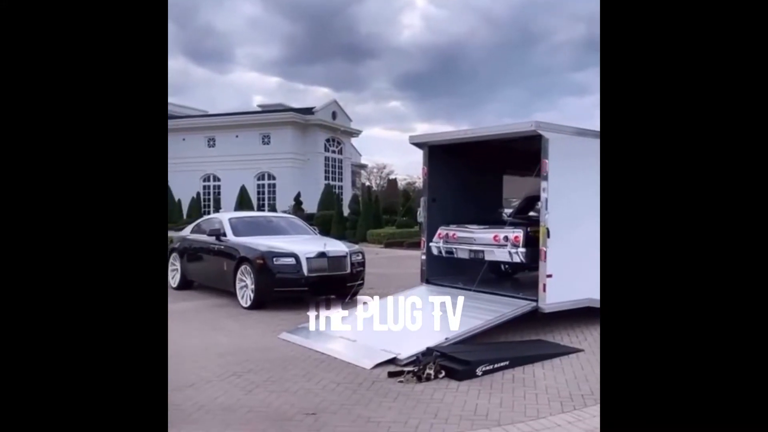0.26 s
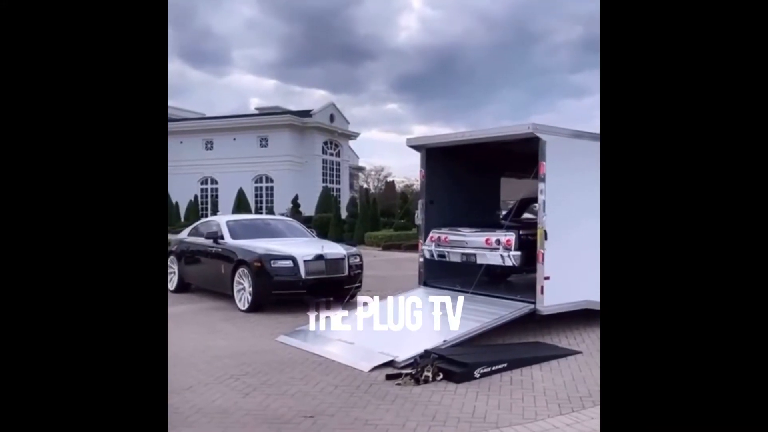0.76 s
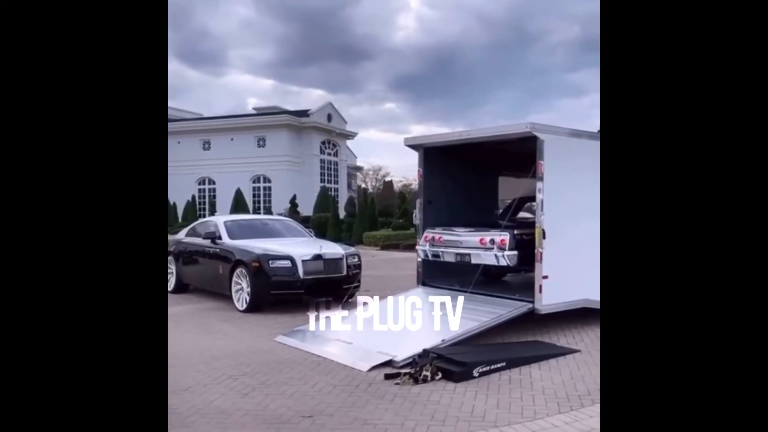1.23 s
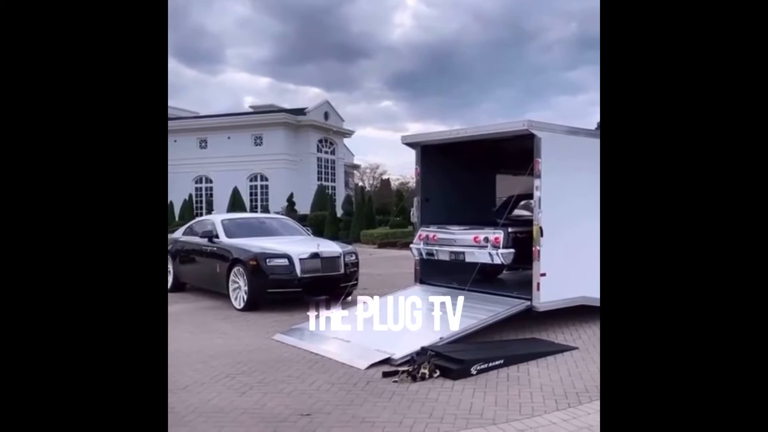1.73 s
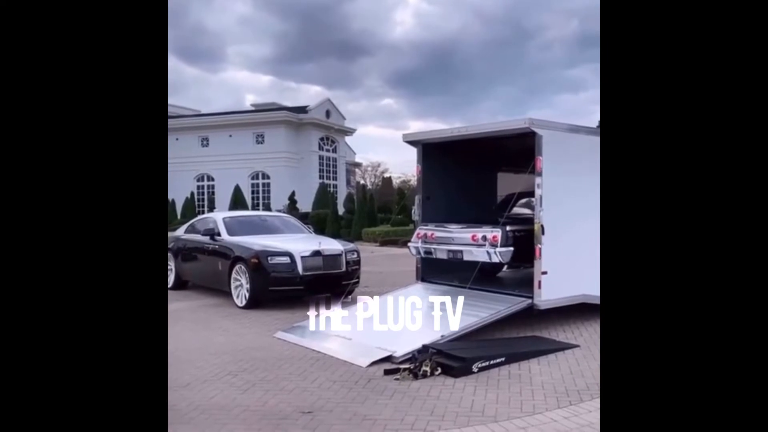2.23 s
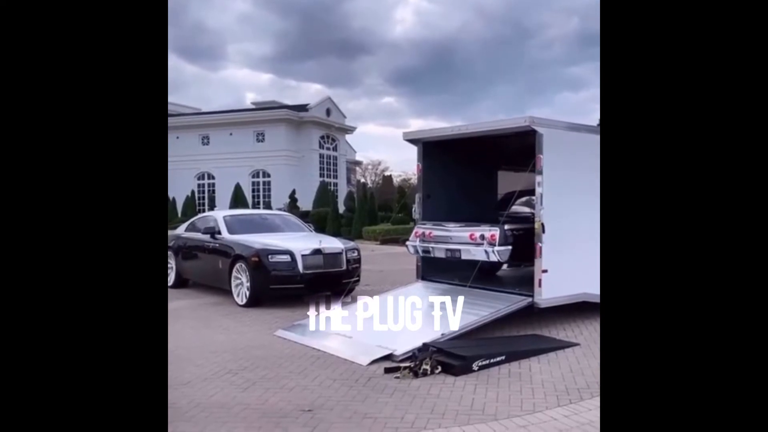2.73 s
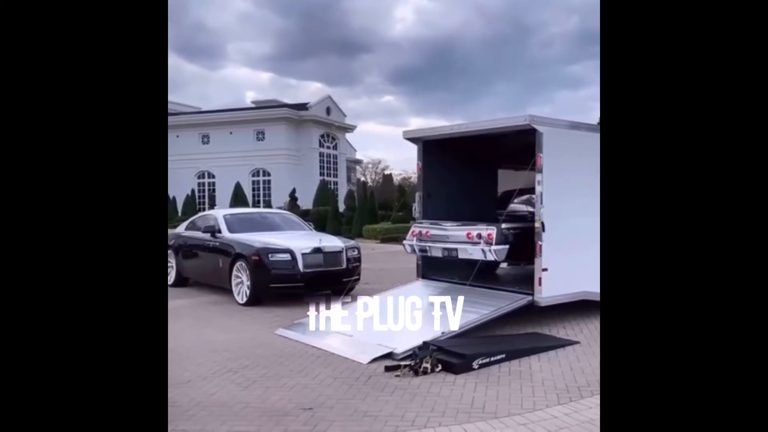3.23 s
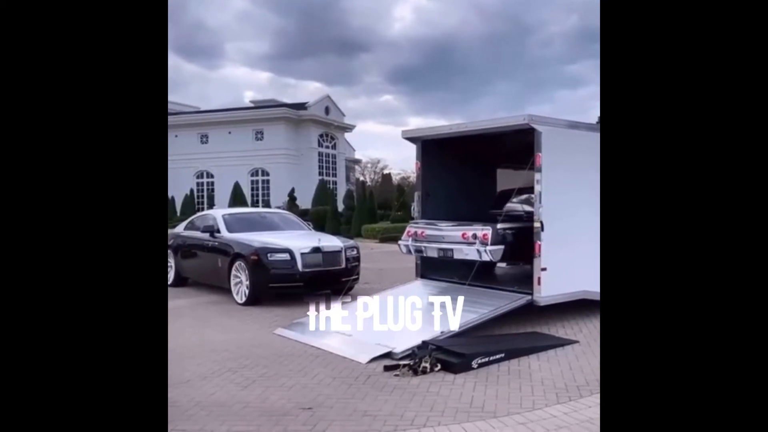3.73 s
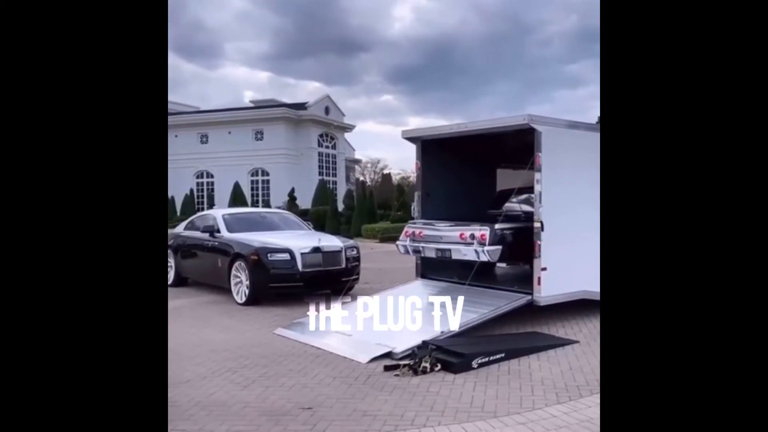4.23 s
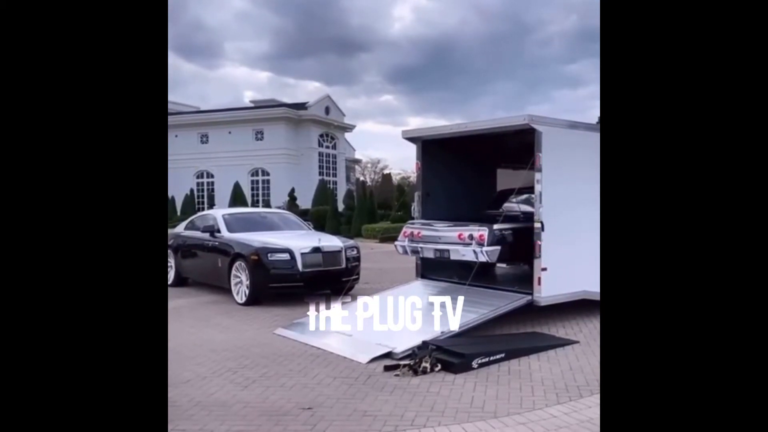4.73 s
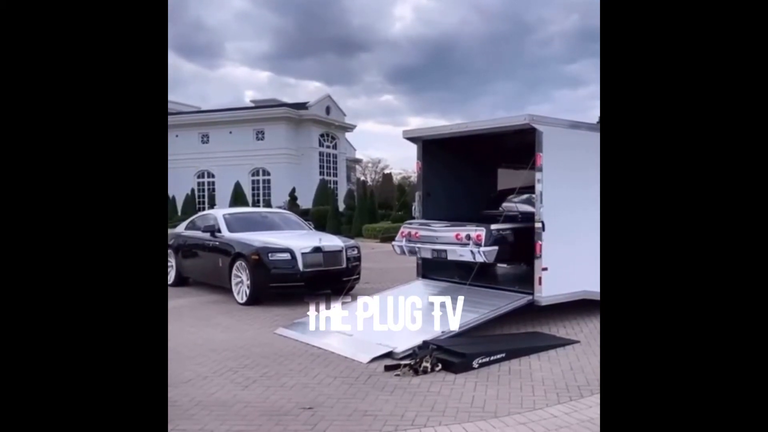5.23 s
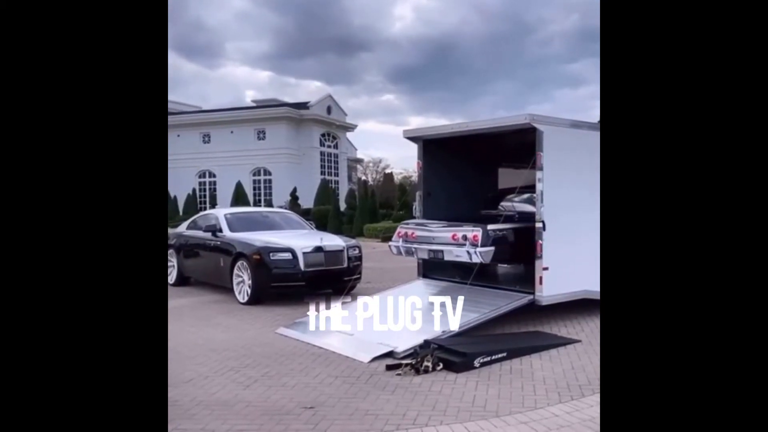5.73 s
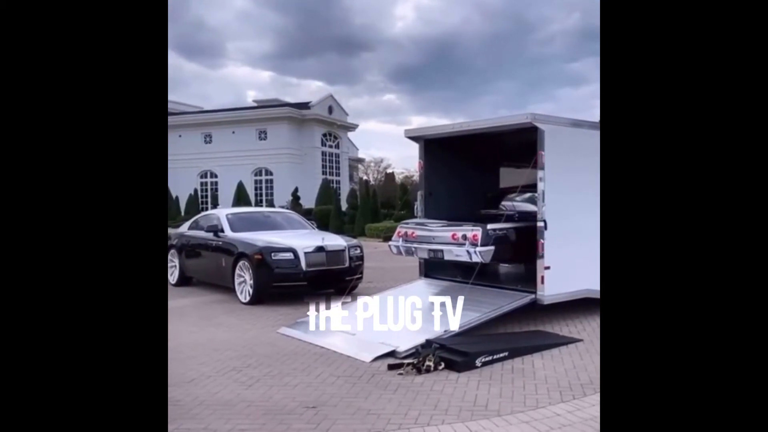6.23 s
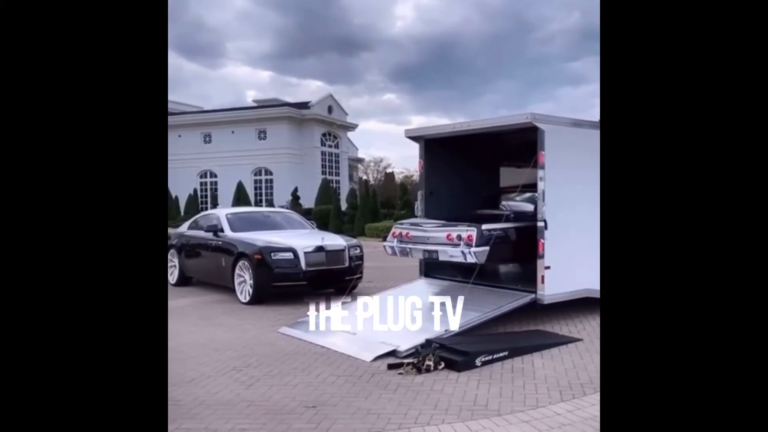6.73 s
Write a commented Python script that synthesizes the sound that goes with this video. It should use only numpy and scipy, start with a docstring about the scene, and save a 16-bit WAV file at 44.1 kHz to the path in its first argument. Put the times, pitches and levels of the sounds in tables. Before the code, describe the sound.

An old V8 engine idles outdoors from start to finish, with a deep, uneven, burbling rumble that slows very slightly. The open box trailer adds a throbbing drone. Behind it are a soft fan hiss with light ticking, a faint wavering belt whine and the very faint hum of a parked car. As the car eases backward, the metal ramp gives light clanks just before 1 second, again around 2.7 seconds, and a small tick at 3.5. The tyres scrub softly around 4.7 seconds, with a clank and a tiny squeak, followed by a creak at about 5.4. Between 6.1 and 6.6 seconds there is a quick cluster of knocks, short high hinge squeaks and more scrubbing. The sharpest clank comes at about 6.9 seconds, over the continuing idle.

```python
"""Outdoors, at the metal ramp of a box trailer, an old V8 idles while the car slowly backs out.
Its uneven firings are a pulse train that drives resonances of exhaust and trailer; behind the boom
are the engine's hiss, valve ticks and whine, and the hum of a parked car. Under the shifting weight
the tyres scrub by friction, the ramp clanks in its own modes and the hinge squeaks by stick-slip."""
import sys
import numpy as np
from scipy import signal
from scipy.fft import rfft, irfft, next_fast_len
from scipy.io import wavfile

SR = 44100
rng = np.random.default_rng(int(sys.argv[2]) if len(sys.argv) > 2 else 0)


def dump(signal):
    """Clip the signal to [-1, 1] and save it as 16-bit WAV at the path in sys.argv[1]."""
    limited = np.clip(np.atleast_2d(signal).T, -1, 1)
    pcm = np.round(limited * 32767).astype(np.int16)
    wavfile.write(sys.argv[1], SR, pcm)


N = 308259
TIME = np.arange(N) / SR
SIZE = next_fast_len(N + SR)  # a ring of samples, with room for what sounds before time zero
HZ = np.fft.rfftfreq(SIZE, 1 / SR) + 1e-3

# engine speed in four-stroke cycles: time_s, cycle_rate_hz
ENGINE_SPEED = [(0.0, 6.451), (0.66, 6.636), (1.29, 6.401), (2.32, 6.497), (2.68, 6.366), (3.9, 6.263),
                (4.28, 6.18), (4.88, 6.192), (5.4, 6.289), (6.01, 6.257), (6.3, 6.08), (6.6, 6.115),
                (7.0, 6.105)]
# cylinders in firing order: relative_strength, delay_in_firing_intervals
FIRING_PATTERN = [(.92, -.042), (.82, .031), (.56, -.131), (.41, .041), (.99, .061), (.62, -.098),
                  (.66, .005), (.5, .129)]
# low resonances of exhaust and trailer: centre_hz, width_hz, polarity
EXHAUST_MODES = [(53.8, 28.4, 1), (87.5, 12.8, -1), (107.2, 39, -1), (139.5, 8, 1)]
# the lower two, as the tailpipes move out and the load changes: time_s, first_db, second_db
LOWER_MODE_LEVELS = [(0.05, -24, -25.5), (0.3, -25, -27), (0.55, -24.9, -26.5), (0.8, -25.3, -30),
                     (1.12, -25.5, -23.5), (1.38, -24, -27.5), (2.1, -25, -25.5), (2.4, -25, -24),
                     (2.72, -25, -26), (3.0, -23.5, -24), (3.75, -24, -23.5), (4.15, -24.5, -26.3),
                     (4.5, -23, -28.5), (4.72, -24.2, -24.5), (4.95, -25, -27), (5.25, -24.5, -26),
                     (5.5, -25, -24.5), (6.05, -25.5, -24.5), (6.28, -26, -29), (6.45, -23.5, -24.5),
                     (6.65, -24.1, -26.5), (6.95, -25, -23.8)]
# the upper two, which each swell once: base_db, slope_db_per_s, peak_s, width_s, lift_db
UPPER_MODE_SWELLS = [(-48, 1.03, 3.6, 0.69, 6.5), (-48, -1.55, 0.65, 0.93, 8.5)]
# spectrum of the exhaust burble: frequency_hz, relative_db
BURBLE_SPECTRUM = [(90, -26), (122, 6), (155, 2), (183, -4), (210, -0.5), (237, -12), (258, -4.5),
                   (292, -8.5), (325, -10.5), (360, -13.5), (410, -23.5), (500, -28.5), (900, -50.5)]
# standing waves in the trailer box: centre_hz, width_hz
BOX_MODES = [(149, 20), (212, 12), (252, 26), (293, 14), (352, 30)]
# their levels as the tailpipes pass through: time_s, then level_db of each wave from low to high
BOX_LEVELS = [(0.1, -53, -50, -62, -46, -60), (1.1, -53.5, -50.5, -61, -49, -58.5),
              (2.3, -49, -51, -53, -54.5, -54), (3.7, -47, -58.5, -50, -60, -58.5),
              (4.7, -41.5, -52, -47.5, -53.5, -53.5), (5.8, -49.5, -54, -48.5, -52, -60.5),
              (6.9, -44, -49.5, -51.5, -50.5, -63.5)]
# spectrum of fan and belt hiss: frequency_hz, relative_db
HISS_SPECTRUM = [(150, -9.5), (330, -0.5), (480, -3.5), (535, -1), (585, 2.5), (760, 3), (950, 0.5),
                 (1700, -0.5), (2750, -4.5), (4100, -7.5), (4500, -11), (5500, -12.5), (5900, -14.5),
                 (8700, -13.5)]
# resonances of the engine bay: centre_hz, width_hz, lift_db
BAY_MODES = [(1145, 30, 3.5), (1370, 150, 1), (2240, 30, 4), (2295, 36, 5.5), (2500, 110, 2),
             (3290, 160, 2.5), (4030, 130, 3)]
# the belt-driven whine and a fainter line just above it: vibrations_per_engine_cycle
BELT_ORDERS = [231, 239]
# the main whine: time_s, level_db
MAIN_WHINE_LEVELS = [(0, -47.5), (.25, -45.5), (.42, -58), (.73, -51), (1.2, -51), (1.3, -56), (1.4, -49.5),
                     (1.62, -51.5), (1.77, -53), (2.0, -54.5), (2.3, -55), (2.55, -55), (2.72, -52),
                     (3.0, -50.5), (3.15, -56), (3.35, -54), (3.47, -48), (3.7, -54.5), (3.95, -58),
                     (4.15, -57), (4.35, -46.5), (4.65, -51.5), (4.95, -62), (5.7, -56), (6.02, -50.5),
                     (6.2, -55.5), (6.55, -49), (6.85, -64)]
# the whine just above it: time_s, level_db
UPPER_WHINE_LEVELS = [(3.1, -66), (3.5, -58), (3.8, -55), (4.05, -48), (4.3, -60), (4.8, -53), (5.8, -61)]
# tones of the parked car: pitch_hz, initial_db, width_hz, slope_db_per_s
HUM_TONES = [(221, -59, 3, -.6), (294, -56, 3, -.6), (359, -62, 4, -1), (369, -53.5, 3, -1.25),
             (432, -74, 3, 2.4), (442, -67, 4, 0), (504, -67, 2, 0), (629, -61.5, 2, .3), (648, -63, 2, 0),
             (685, -58, 2, 0), (1369, -60.5, 2, 0), (1887, -60, 13, .3)]
# spectrum of the open air: frequency_hz, relative_db
AIR_SPECTRUM = [(8, -13.0), (22, -9.0), (38, -4.0), (70, 1.0), (150, -12.5), (600, -47.0)]
# tyres scrubbing on the deck: peak_s, length_s, level_db
TYRE_SCRUBS = [(0.017, 0.38, -45.5), (4.685, 0.76, -40.5), (6.227, 0.12, -42.5), (6.402, .09, -45),
               (6.55, .3, -47)]
# spectrum of dragging rubber: frequency_hz, relative_db
SCRUB_SPECTRUM = [(250, -14), (650, -3), (1100, -1.5), (2500, -3), (4000, -1.5), (5200, -10), (6500, -16.5),
                  (8700, -17.5)]
# clanks and creaks of ramp and trailer: start_s, level_db, bright_hz, spread_octaves, rise_s, t60_s
RAMP_CLANKS = [(.813, -36.5, 2400, .4, .0015, .15), (.965, -34, 2500, 0.67, .0004, .15),
               (.967, -34, 750, .6, .002, .11), (.976, -40, 4300, .4, .006, .18),
               (2.673, -34.5, 2000, 1.8, .005, .16), (2.746, -35.5, 4600, 2.2, .001, 0.15),
               (3.489, -37.5, 3000, 1.5, .001, 0.055), (4.765, -39, 5200, .6, .006, .15),
               (4.813, -35.5, 1900, .7, .0005, .1), (5.356, -38, 2150, 0.33, .008, 0.28),
               (6.147, -36, 1980, .15, .002, 0.11), (6.233, -32, 730, .3, .0023, .04),
               (6.246, -31.5, 2200, .45, .0008, 0.069), (6.258, -39, 1300, .6, .002, .12),
               (6.388, -32.5, 1860, .12, .0008, .075), (6.912, -26.5, 1750, 0.37, .0004, 0.045),
               (6.914, -34, 900, 0.65, .001, .09), (6.917, -35.5, 3000, .12, .002, .07),
               (6.927, -34, 500, .5, .0008, .035)]
# resonances of the metal deck: centre_hz, width_hz, lift_db
RAMP_MODES = [(694, 470, 9), (1600, 110, 9), (1870, 130, 7), (2200, 180, 5), (2560, 200, 5)]
# squeaks of the ramp hinge: start_s, length_s, pitch_hz, level_db
HINGE_SQUEAKS = [(4.812, .012, 2620, -40.5), (6.145, 0.012, 2620, -37), (6.201, 0.025, 2520, -41),
                 (6.38, 0.021, 2580, -40.5)]


def amp(db):
    """Amplitude ratio of a level in decibels."""
    return 10 ** (np.asarray(db) / 20)


def unit_rms(x):
    """Normalisation to rms 1."""
    return x / np.sqrt(np.mean(x ** 2) + 1e-20)


def curves(rows):
    """Linear interpolation of each column of (time_s, ...) rows to every sample."""
    time_s, *columns = np.transpose(rows)
    return [np.interp(TIME, time_s, column) for column in columns]


def spectrum(points):
    """Gain from (frequency_hz, relative_db) points joined on a log-frequency axis."""
    hz, db = np.transpose(points)
    return amp(np.interp(np.log(HZ), np.log(hz), db))


def lifts(humps, along):
    """Gain of Lorentzian (centre, width, lift_db) humps along frequency or time."""
    return amp(sum(db / (1 + (2 * (along - centre) / width) ** 2) for centre, width, db in humps))


def resonance(hz, width_hz):
    """Response of two like damped resonators in cascade."""
    return (1 + 1j * (HZ ** 2 - hz ** 2) / (HZ * width_hz)) ** -2


def filtered(x, response):
    """Filtering by multiplication of spectra, at rms 1."""
    return unit_rms(irfft(rfft(x, SIZE) * response, SIZE)[:N])


def noise(response):
    """Spectrally shaped Gaussian noise, at rms 1."""
    return filtered(rng.standard_normal(SIZE), response)


def drift(hz):
    """Random fluctuation, low-passed near hz, at rms 1."""
    return noise(np.exp(-(HZ / hz) ** 2))


def firings(cycles, unevenness, jitter_s, first_cycle=.114):
    """A quasi-periodic pulse train: one impulse a firing, and no two burn quite alike."""
    strength, delay = np.transpose(FIRING_PATTERN)
    count = len(FIRING_PATTERN)
    firing = np.arange(-2 * count, count * (int(cycles[-1]) + 2))
    at_cycle = first_cycle + (firing + delay[firing % count]) / count
    mean_rate_hz = cycles[-1] / TIME[-1]
    beyond_ends_s = (at_cycle - np.clip(at_cycle, 0, cycles[-1])) / mean_rate_hz
    start_s = np.interp(at_cycle, cycles, TIME) + beyond_ends_s
    burn, slip = rng.standard_normal((len(firing), 2)).T
    starts = np.round((start_s + jitter_s * slip) * SR).astype(int)
    train = np.zeros(SIZE)
    train[starts] = strength[firing % count] * (1 + unevenness * burn)
    return train


def exhaust(cycles, lope=0.037, lowest_hz=33):
    """Forced resonance: low modes of pipes and trailer boom as firing harmonics come into tune."""
    train = firings(cycles, unevenness=0.075, jitter_s=.00008)
    radiated = 1 / np.hypot(1, (lowest_hz / HZ) ** 6)  # the lowest frequencies fall away steeply
    gains = [amp(db) for db in curves(LOWER_MODE_LEVELS)]
    gains += [amp(db + slope * TIME) * lifts([swell], TIME) for db, slope, *swell in UPPER_MODE_SWELLS]
    boom = sum(polarity * gain * filtered(train, resonance(hz, width_hz) * radiated)
               for (hz, width_hz, polarity), gain in zip(EXHAUST_MODES, gains))
    return boom * (1 + lope * drift(18))  # whole cycles run a little richer or leaner


def burble(cycles, level_db=-42.0, gas_db=-1, ring_s=.04, lowest_hz=185):
    """Scattering: trailer walls shift the phases of the firing overtones; each puff adds a gas gust."""
    train = firings(cycles, unevenness=0.13, jitter_s=0.00019)
    t = TIME[:SR // 4]
    walls = rfft(rng.standard_normal(len(t)) * np.exp(-t / ring_s), SIZE)
    scatter = walls / abs(walls) / np.hypot(1, (lowest_hz / HZ) ** 10)  # long waves are not scattered
    gust = filtered(train, 1 / (1 + 1j * HZ / 25))
    gas = filtered((1.0 + gust) * rng.standard_normal(N), spectrum(BURBLE_SPECTRUM))
    overtones = filtered(train, spectrum(BURBLE_SPECTRUM) * scatter)
    return amp(level_db) * unit_rms(0.4 * overtones + amp(gas_db) * gas)


def trailer_box(cycles, throb_db=2.5):
    """Standing waves: the uneven firings sustain a throbbing drone between the walls of the box."""
    train = firings(cycles, unevenness=0.048, jitter_s=.00008)
    drone = sum(amp(db) * filtered(train, resonance(hz, width_hz))
                for (hz, width_hz), db in zip(BOX_MODES, curves(BOX_LEVELS)))
    return drone * unit_rms(amp(throb_db * drift(12)))


def engine_hiss(cycles, level_db=-40.5, tick_depth=0.15, flutter_db=0.95):
    """Amplitude modulation: fan and belt noise pulses with the valves, coloured by the engine bay."""
    valves = np.exp(-(6 * cycles % 1) / .3)  # six ticks a cycle
    rush = rng.standard_normal(N) * (1 + tick_depth * valves) * amp(flutter_db * drift(21))
    return amp(level_db) * filtered(rush, spectrum(HISS_SPECTRUM) * lifts(BAY_MODES, HZ))


def alternator(cycles, waver_hz=10, flicker_db=2.4):
    """Rotational orders: a belt-driven whine and a fainter line eight orders above it waver about fixed
    multiples of the engine speed."""
    out = np.zeros(N)
    for order, levels in zip(BELT_ORDERS, (MAIN_WHINE_LEVELS, UPPER_WHINE_LEVELS)):
        turns = order * cycles + np.cumsum(waver_hz * drift(70)) / SR
        whine = np.sin(2 * np.pi * turns) * amp(flicker_db * drift(41))
        out += amp(curves(levels)[0]) * unit_rms(whine)
    return out


def tone(hz):
    """A sinusoid of rms 1 whose phase is the integral of its frequency."""
    return np.sqrt(2) * np.sin(2 * np.pi * np.cumsum(hz) / SR)


def parked_car():
    """A line spectrum: the hum is a sum of tones, each broadened by slight frequency modulation."""
    return sum(amp(db + slope * TIME) * tone(hz + width_hz / 2 * drift(5.92))
               for hz, db, width_hz, slope in HUM_TONES)


def open_air(level_db=-53):
    """Ambient noise: a faint rumble with its energy at low frequencies."""
    return amp(level_db) * noise(spectrum(AIR_SPECTRUM))


def tyres(grain_db=1.0, edge_db=-7.5):
    """Sliding friction: rubber drags grainily on the deck, edge_db down at the ends of each scrub."""
    drag = sum(amp(db + edge_db * np.log2(1 + (2 * (TIME - peak_s) / length_s) ** 2))
               for peak_s, length_s, db in TYRE_SCRUBS)
    grains = rng.standard_normal(N) * amp(grain_db * drift(150))
    return drag * filtered(grains, spectrum(SCRUB_SPECTRUM))


def ramp(thud_db=-10, air_hz=5000, echo_db=-17, echo_t60_s=0.13):
    """Damped free vibration: each shift of weight rattles the metal deck, and the box echoes it."""
    out, t = np.zeros(N + SR), TIME[:SR // 2]
    hz = np.fft.rfftfreq(len(t), 1 / SR) + 1
    for start_s, db, bright_hz, octaves, rise_s, t60_s in RAMP_CLANKS:
        contact = 1 / (1 + (np.log2(hz / bright_hz) / octaves) ** 2)
        thud = amp(thud_db) * octaves / (1 + np.log2(hz / 600) ** 2)  # broad blows shake the whole deck
        # a narrow creak picks out the modes, a broad blow blurs them
        ringing = lifts(RAMP_MODES, hz) ** (1 / (1 + octaves ** 2))
        colour = ringing * (contact + thud) / np.hypot(1, (hz / air_hz) ** 2)
        rattle = unit_rms(irfft(rfft(rng.standard_normal(len(t))) * colour, len(t)))
        attack = 1 - np.exp(-t / rise_s)
        decay = np.hypot(amp(-60 * t / t60_s), amp(echo_db - 60 * t / echo_t60_s))
        start = round(start_s * SR)
        out[start:start + len(t)] += amp(db) * rattle * attack * decay
    return out[:N]


def hinge(edge_s=0.0037, waver_hz=85, rough_db=3):
    """Stick-slip oscillation: the hinge catches and releases in short, rough squeaks."""
    waver, out = waver_hz * drift(600), np.zeros(N)
    for start_s, length_s, hz, db in HINGE_SQUEAKS:
        gate = np.clip(np.minimum(TIME - start_s, start_s + length_s - TIME) / edge_s, 0, 1)
        out += amp(db) * gate * tone(hz + waver)
    return out * unit_rms(amp(rough_db * drift(300)))


def scene():
    """Superposition: all sources add in one channel; the engine's parts share one crankshaft."""
    cycles = np.cumsum(curves(ENGINE_SPEED)[0]) / SR
    engine = exhaust(cycles) + burble(cycles) + trailer_box(cycles)
    engine += engine_hiss(cycles) + alternator(cycles)
    return (engine + parked_car() + open_air() + tyres() + ramp() + hinge())[None]


def record(dry, cutoff_hz=8700):
    """Band limiting: a linear-phase low-pass filter removes the highest treble."""
    lowpass = signal.firwin(1023, cutoff_hz, window=("kaiser", 9), fs=SR)
    return signal.oaconvolve(dry, lowpass[None], "same")


dry = scene()
out = record(dry)
dump(out)
```